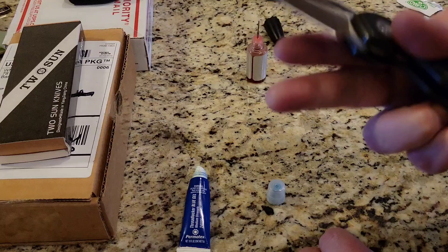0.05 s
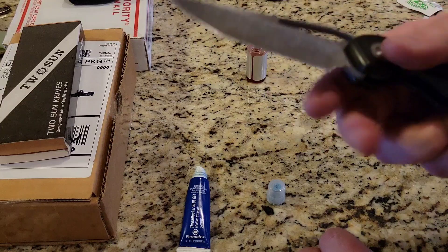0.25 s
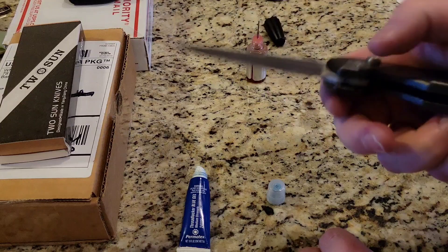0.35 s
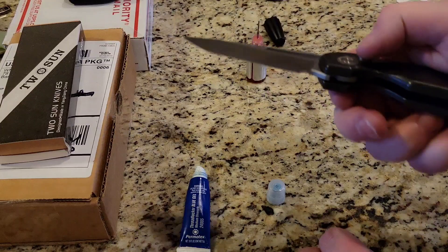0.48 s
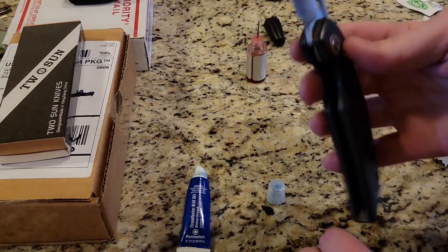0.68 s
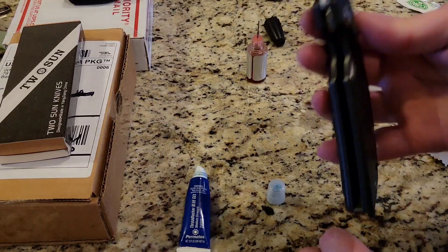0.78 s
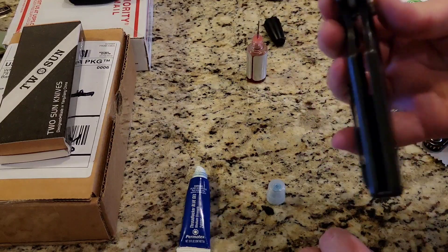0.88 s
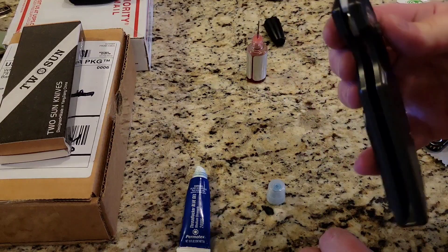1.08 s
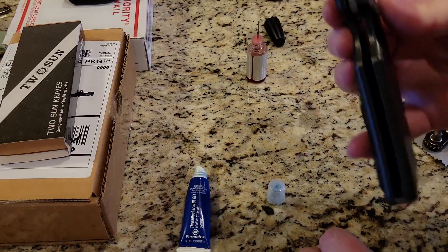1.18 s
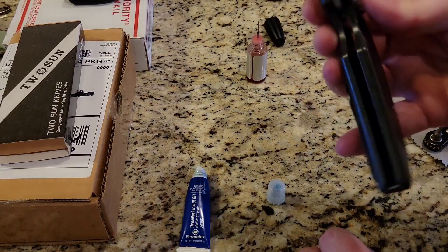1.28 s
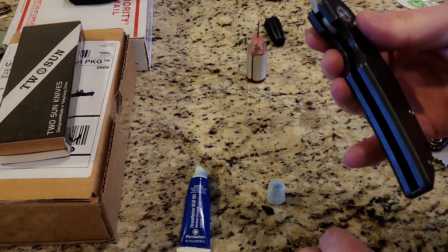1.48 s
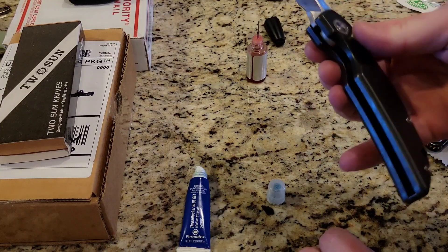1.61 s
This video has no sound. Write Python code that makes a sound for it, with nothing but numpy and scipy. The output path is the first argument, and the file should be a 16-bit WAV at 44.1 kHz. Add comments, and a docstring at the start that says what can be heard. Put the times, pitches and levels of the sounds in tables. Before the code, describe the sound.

Folding knife blade slides quickly and locks open with a loud bright click, then faint finger rub

```python
"""In a hard room, close to two spaced microphones over a stone counter, a folding knife is flicked open.
The blade leaves its detent, slides on the pivot and the lock snaps in: each contact is a burst of noise plus
fading sine tones for handle and blade. The slide, and a finger's faint rub, which grows clearer after the snap,
are tiny random catches that ring the handle, plus a hiss. Echoes and a fading tail of noise answer.
Appliances hum as wavering sine tones under a soft room noise made of filtered noise."""
import sys
import numpy as np
from scipy import signal
from scipy.fft import rfft, irfft, next_fast_len
from scipy.io import wavfile
from scipy.ndimage import map_coordinates

SR = 44100
rng = np.random.default_rng(int(sys.argv[2]) if len(sys.argv) > 2 else 0)


def boost_factor(decibels):
    """Convert a level in decibels to a linear amplitude factor."""
    exponent = np.asarray(decibels, float) / 20
    return 10 ** exponent


def master_out(mix):
    """Clip the mix to full scale and print it as 16-bit PCM to the path in sys.argv[1]."""
    frames = np.transpose(np.atleast_2d(mix))
    ceiling = np.clip(frames, -1, 1)
    pcm = np.round(ceiling * 32767).astype(np.int16)
    wavfile.write(sys.argv[1], SR, pcm)


N = 72765  # length in samples

# Appliance tones: f/Hz, rms level/dB, size of the level's waver/dB
HUM_TONES = [(60, -68, 1.1), (78.9, -62, -0.26), (97, -65, 1.1), (192, -70.5, 4), (377.5, -79, 1.5),
             (486, -79.5, 1.5), (500, -69, 4)]
# Soft room noise: f/Hz, level in each hertz/dB
AIR_SPECTRUM = [(15, -110), (30, -93), (70, -88), (120, -85.5), (150, -94), (190, -82), (260, -92.5),
                (330, -89), (450, -94), (550, -94), (700, -101), (1000, -106), (1400, -110), (2100, -119),
                (2600, -120), (2950, -115), (3400, -121), (5000, -127), (8000, -135), (10500, -135),
                (13000, -130), (15800, -131), (17200, -160)]
# How alike the background noise is at left and right: f/Hz, likeness (1 same, 0 unrelated, -1 opposite)
LEFT_RIGHT_LIKENESS = [(60, 0.71), (130, 0.92), (290, 0.86), (640, 0.26), (1410, 0.12), (3100, -0.61),
                       (6820, -0.07), (15000, 0.02)]
# How far the background leans to one side: f/Hz, left minus right level/dB
LEFT_RIGHT_LEAN = [(60, -3), (110, -1.5), (200, -2), (380, -4.5), (700, -5.5), (1290, -2.5), (2380, -3.0),
                   (4400, -6.5), (8120, -1), (15000, -4)]
# Fingers shifting on the handle: t/s, soft ringing level/dB, skin rustle level/dB (before the lean to the right)
FINGER_MOVES = [(0, -100, -100), (.08, -88, -91), (.13, -100, -100), (.48, -105, -100), (.53, -98, -86),
                (.60, -105, -90.5), (.64, -105, -105), (.69, -92, -94), (.712, -76, -79),
                (.721, -72.5, -79), (.728, -57.5, -78), (.736, -110, -84), (.79, -106, -86.5),
                (.83, -100, -105), (1.40, -105, -105), (1.43, -94, -95), (1.45, -105, -105)]
# Colour of the skin rustle: f/Hz, relative level in each hertz/dB
SKIN_SPECTRUM = [(1000, -29.5), (3000, -3), (8000, -3), (10500, -7), (13000, -0.5), (16000, -2),
                 (17200, -60.5)]
# Tones of the handle, damped by the hand: f/Hz, relative level/dB, time to fall 60 dB/s
HANDLE_MODES = [(1580, -26, .06), (1900, -21.5, .02), (2880, -27.5, .03), (2925.5, -16.5, 0.024),
                (2937, -56.5, 0.8), (3010, -55, .8), (3047, -17.5, .03), (3700, -14.5, 0.028),
                (4277, -14.5, .03), (5040, -11, .03), (5370, -40, .5), (5390, -38, 0.55), (5430, -12, .03),
                (6034, -11, 0.027), (7500, -13, 0.016), (8500, -18, .012), (11750, -13.5, .009),
                (12900, -18, 0.0027), (14900, -17.5, .008)]
# The blade sliding round its pivot: t/s, level of the catches/dB
SLIDE_EFFORT = [(0.128, -84), (0.136, -58.5), (.156, -56.5), (.170, -44.5), (.185, -56), (.212, -60.5),
                (.229, -41), (.24, -90.5)]
# Colour of the sliding hiss: f/Hz, relative level in each hertz/dB
SLIDE_SPECTRUM = [(700, -28.5), (1300, -14), (1900, -2), (2500, -2.5), (3000, 4), (3600, -6), (6000, -9),
                  (10000, -9), (14000, -13), (16000, -15), (17200, -60)]
# Metal contacts: t/s, level/dB, favoured pitch of the struck place f/Hz, rise time/ms, blade ring level/dB
METAL_CONTACTS = [(0.1381, -49.5, 6108, 0.28, -71.5), (0.1426, -32, 6040, .9, -74.5),
                  (0.162, -46, 5700, 0.89, -75), (.1675, -37, 6000, 0.58, -48.5),
                  (.1715, -40.5, 6100, .5, -70), (.1765, -38, 2950, .5, -75.5),
                  (.2275, -23.5, 2950, 1.5, -76), (0.2303, -6.5, 2926, 0.3242, -46.5),
                  (0.2387, -27, 2950, .4, -74)]
# Tone of the free blade, which rings on: f/Hz, relative level/dB, time to fall 60 dB/s
BLADE_MODES = [(9432, 0, .45)]
# Colour of the crack at a contact: f/Hz, relative level in each hertz/dB
CRACK_SPECTRUM = [(200, -32), (400, -26), (800, -30), (1200, -8.5), (1900, -4), (2400, -8), (3000, -1.5),
                  (5500, 2), (8000, -4), (10000, -11.5), (13500, -7), (16000, -9), (17200, -61)]
# Fading of the room's tail: f/Hz, time to fall 60 dB/s
ROOM_FADE = [(300, .15), (1000, .27), (1900, 0.39), (2600, 0.35), (2950, 0.47), (3400, 0.42), (4300, .36),
             (5300, 0.24), (6500, .28), (8000, 0.29), (11000, 0.13), (15000, .18)]
# Wall echoes, before a small random scatter: delay t/s, level/dB
WALL_ECHOES = [(.008, -17), (.014, -21.5), (.019, -22.5), (.023, -21), (.027, -23.5), (.031, -25.5)]


def unit(x):
    """Scale a sound to rms 1."""
    return x / np.sqrt(np.mean(x ** 2) + 1e-20)


def along(points, hz):
    """Read a curve of (frequency, value) points along a logarithmic frequency axis."""
    f, value = np.transpose(points)
    return np.interp(np.log(hz + 1), np.log(f + 1), value)


def wobble(rate):
    """A smooth random curve through `rate` random points a second."""
    points = rng.standard_normal(int(N * rate / SR) + 4)
    return map_coordinates(points, [np.arange(N) * rate / SR])


def filtered(x, response):
    """Filter a sound: multiply each of its frequencies by the response there."""
    size = next_fast_len(x.shape[-1] + 8192)
    spectrum = rfft(x, size) * response(np.fft.rfftfreq(size, 1 / SR))
    return irfft(spectrum, size)[..., :x.shape[-1]]


def background():
    """Appliance tones waver over noise that is partly shared by the two sides, leaning a little to the right."""
    phase_drift = 0.05  # radians for each dB of waver
    t = np.arange(N) / SR
    hum = np.zeros(N)
    for hz, db, waver_db in HUM_TONES:
        level = np.sqrt(2) * boost_factor(db + waver_db * wobble(3))  # sqrt(2) turns rms into peak
        drift = phase_drift * waver_db * wobble(16)
        hum += level * np.sin(2 * np.pi * (hz * t + rng.random()) + drift)

    def middle_and_side(hz):
        # The more alike left and right are, the more noise goes to the middle
        angle = np.arccos(np.clip(along(LEFT_RIGHT_LIKENESS, hz), -1, 1)) / 2
        return boost_factor(along(AIR_SPECTRUM, hz)) * [np.cos(angle), np.sin(angle)]

    mid, side = filtered(rng.standard_normal((2, N)), middle_and_side)
    air = np.sqrt(SR / 2) * np.array([mid + side, mid - side])
    return filtered(air + hum, lambda hz: boost_factor(np.outer([.5, -.5], along(LEFT_RIGHT_LEAN, hz))))


def control(rows):
    """Turn each dB column of a timed table into a gain for every sample."""
    s, *columns = np.transpose(rows)
    t = np.arange(N) / SR
    return [boost_factor(np.interp(t, s, column, left=-150, right=-150)) for column in columns]


def ring(modes, t, favoured_hz, longer=1):
    """Fading tones, strongest near the favoured pitch; level and phase differ at each microphone."""
    favour_db, favour_octaves = 15, .08
    scatter_db, phase_spread = 2.12, 0.79  # random spread between microphones, phase in radians
    hz, db, t60 = np.transpose(modes)[:, :, None]
    distance = np.log2(hz / favoured_hz) / favour_octaves
    level = db + favour_db * np.exp(-.5 * distance ** 2)
    level = level + scatter_db * rng.standard_normal((2, len(modes), 1))
    phase = 2 * np.pi * rng.random((len(modes), 1))
    phase = phase + phase_spread * rng.standard_normal((2, len(modes), 1))
    tones = boost_factor(level - 60 * t / (t60 * longer)) * np.sin(2 * np.pi * hz * t + phase)
    return tones.sum(axis=1)


def catches(effort, per_s, body):
    """Tiny catches at random moments, each making the body ring."""
    happens = rng.random(N) < per_s / SR
    grains = effort * happens * rng.standard_normal(N)
    ringing = signal.fftconvolve(grains[None], body, axes=1)[:, :N]
    return ringing * np.sqrt(SR / per_s) / np.linalg.norm(body[0])


def hiss(spectrum):
    """Stereo noise of the given colour, at rms 1."""
    return unit(filtered(rng.standard_normal((2, N)), lambda hz: boost_factor(along(spectrum, hz))))


def fingers():
    """A looser grip lets the handle ring longer; soft skin stirs only its middle tones and rustles."""
    low_hz, top_hz = 2500, 6600
    rise_ms, catches_per_s, left_minus_right_db = 1.5, 5600, -7.5
    effort, rustle = control(FINGER_MOVES)
    t = np.arange(SR // 5) / SR
    middle_modes = [row for row in HANDLE_MODES if low_hz < row[0] < top_hz]
    body = ring(middle_modes, t, np.inf, longer=1.3)  # np.inf: no pitch is favoured
    body = body * (1 - np.exp(-1000 * t / rise_ms))
    rub = catches(effort, catches_per_s, body) + rustle * hiss(SKIN_SPECTRUM)
    return rub * boost_factor(np.array([[.5], [-.5]]) * left_minus_right_db)


def sliding():
    """Steel slides on steel: tiny catches ring the handle over a hiss."""
    catches_per_s, hiss_db = 3300, 2  # hiss level is relative to the catches
    effort, = control(SLIDE_EFFORT)
    body = ring(HANDLE_MODES, np.arange(SR // 10) / SR, np.inf)
    return catches(effort, catches_per_s, body) + boost_factor(hiss_db) * effort * hiss(SLIDE_SPECTRUM)


def contacts():
    """Each contact cracks, jolts the whole knife in the hand, and rings the handle and the blade."""
    crack_db, crack_t60_s, handle_db = 0.5, 0.011, -1
    push_db, push_hz, push_ms = -34, 450, 2.5  # the jolt
    left_lag_ms = .3
    out, t = np.zeros((2, N + SR)), np.arange(SR) / SR
    for s, db, favoured_hz, rise_ms, blade_db in METAL_CONTACTS:
        noise = unit(filtered(rng.standard_normal((2, len(t))), lambda hz: boost_factor(along(CRACK_SPECTRUM, hz))))
        crack = boost_factor(crack_db - 60 * t / crack_t60_s) * noise
        handle = boost_factor(handle_db) * ring(HANDLE_MODES, t, favoured_hz)
        push = boost_factor(push_db) * np.sin(2 * np.pi * push_hz * t) * np.exp(-1000 * t / push_ms)
        blade = boost_factor(blade_db) * ring(BLADE_MODES, t, np.inf)
        sound = boost_factor(db) * (crack + handle + push) + blade
        sound = sound * (1 - np.exp(-1000 * t / max(rise_ms, .02)))
        for channel, lag_ms in enumerate([left_lag_ms, 0]):
            start = round((s + lag_ms / 1000) * SR)
            out[channel, start:][:len(t)] += sound[channel]
    return out[:, :N]


def room(x):
    """A few wall echoes, a diffuse tail and a weaker, longer one from the next room."""
    tail_db, tail_delay_s = -13.5, .007
    late_db, late_longer = -24, 2.6  # next room's tail: level against the first tail, times as long
    hz, t, noise = signal.stft(rng.standard_normal((2, SR)), SR, nperseg=256)
    fall_db = -60 * t / along(ROOM_FADE, hz)[:, None]
    fading = boost_factor(fall_db) + boost_factor(late_db + fall_db / late_longer)
    tail = signal.istft(noise * fading, SR, nperseg=256)[1]
    tail = boost_factor(tail_db) * tail / np.linalg.norm(tail[0])
    tail = np.pad(tail, ((0, 0), (round(tail_delay_s * SR), 0)))
    for s, db in WALL_ECHOES:
        # Each side's echo is scattered a little in time and level
        at = np.round((s + .001 * rng.standard_normal(2)) * SR).astype(int)
        tail[[0, 1], at] += boost_factor(db + 2 * rng.standard_normal(2))
    return signal.fftconvolve(x, tail, axes=1)[:, :N]


def scene():
    """The knife, the room's answer to it, and the background."""
    knife = contacts() + sliding() + fingers()
    return knife + room(knife) + background()


def roll_off(x):
    """The treble ends steeply here."""
    return signal.sosfilt(signal.butter(12, 17020, fs=SR, output="sos"), x)


def record(dry):
    """Turn the finished mix into the output sound."""
    return roll_off(dry)


dry = scene()
out = record(dry)
master_out(out)
```